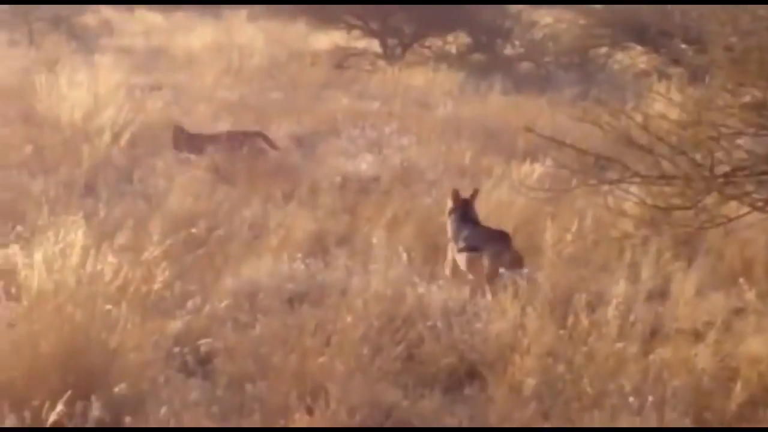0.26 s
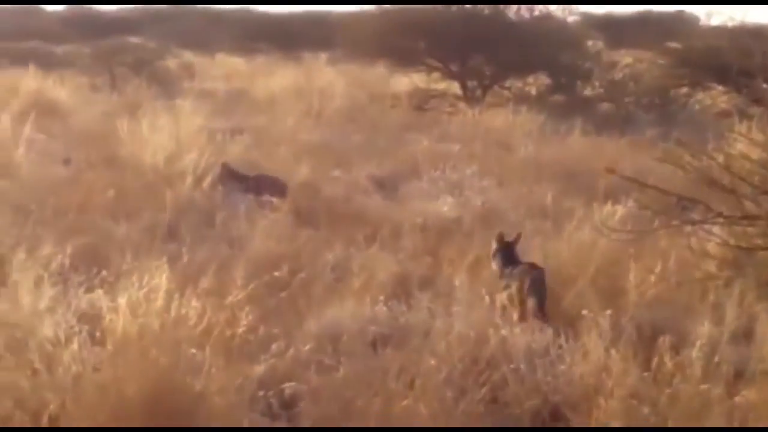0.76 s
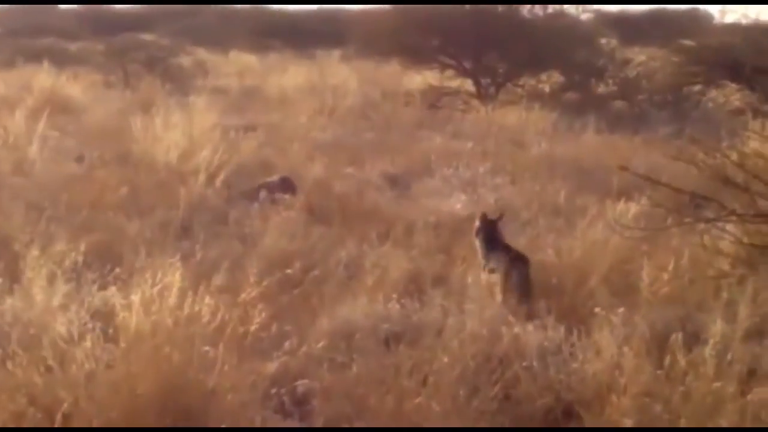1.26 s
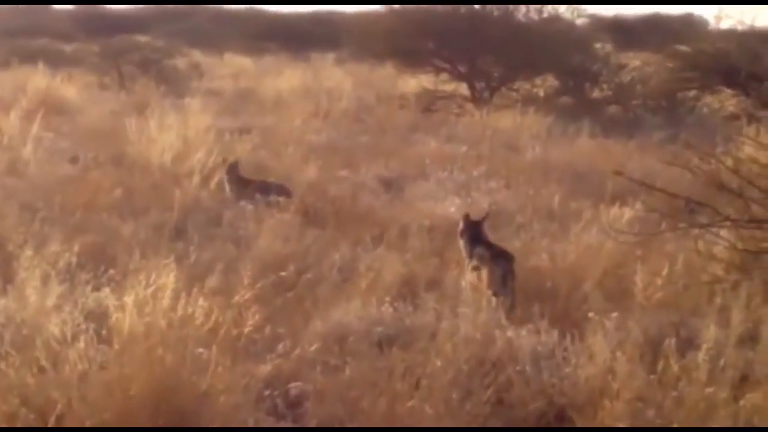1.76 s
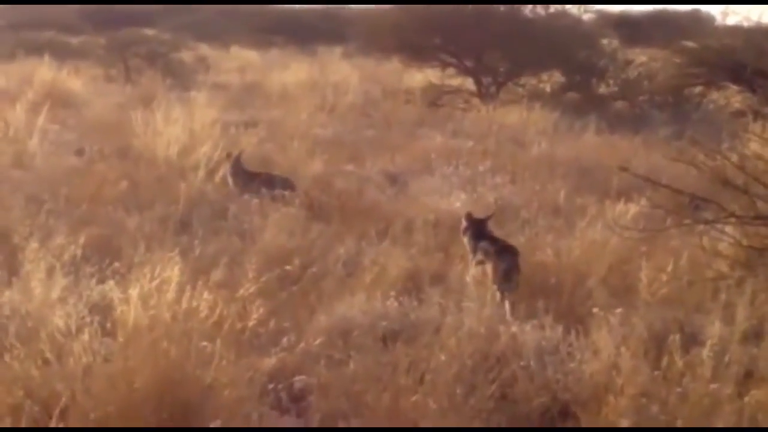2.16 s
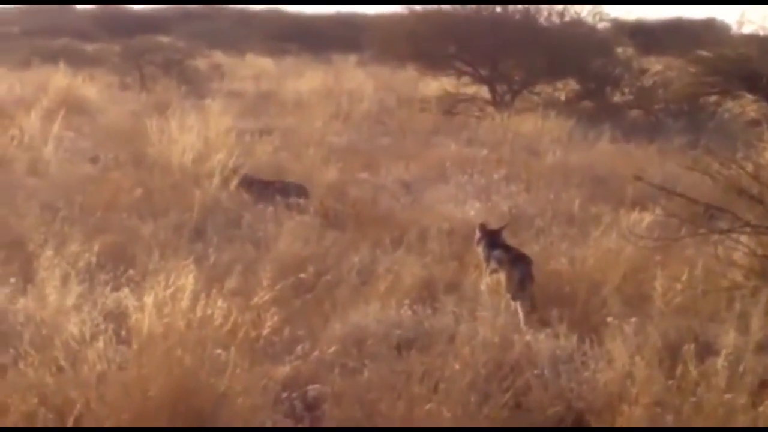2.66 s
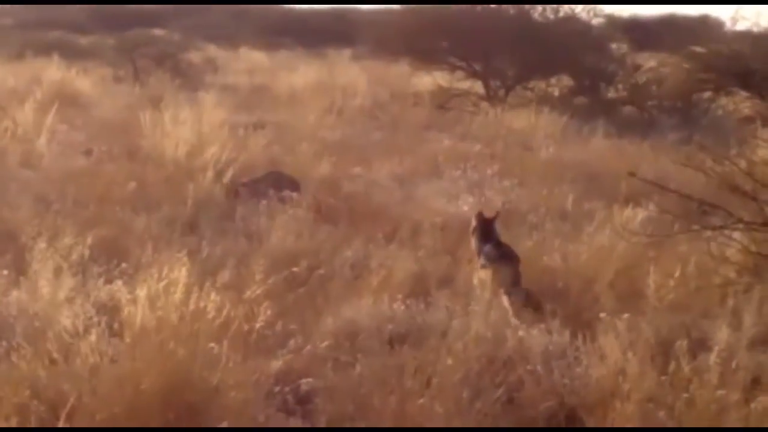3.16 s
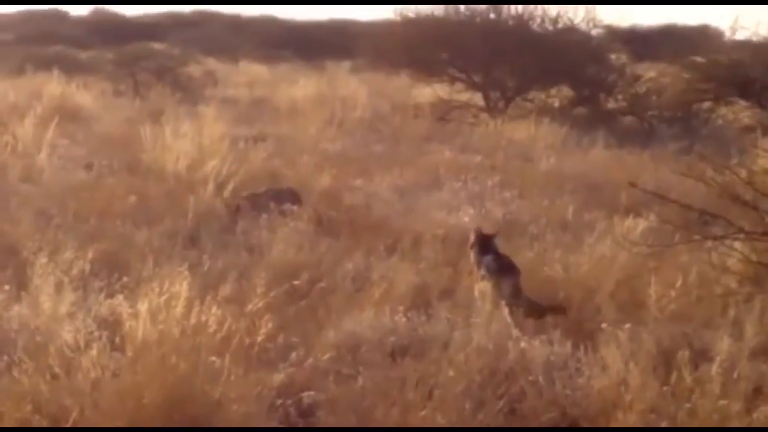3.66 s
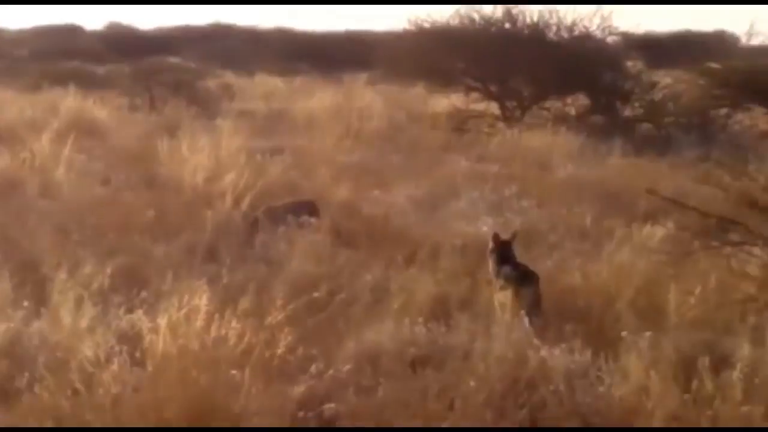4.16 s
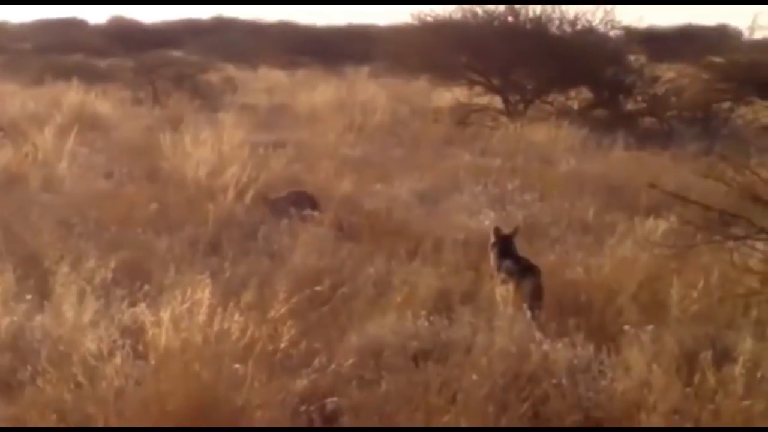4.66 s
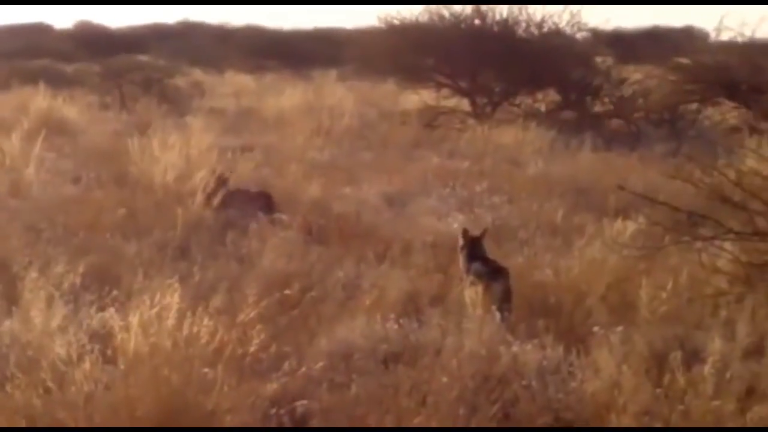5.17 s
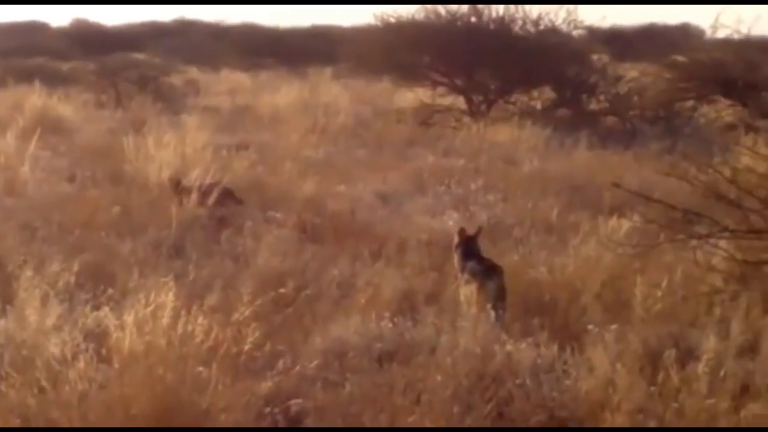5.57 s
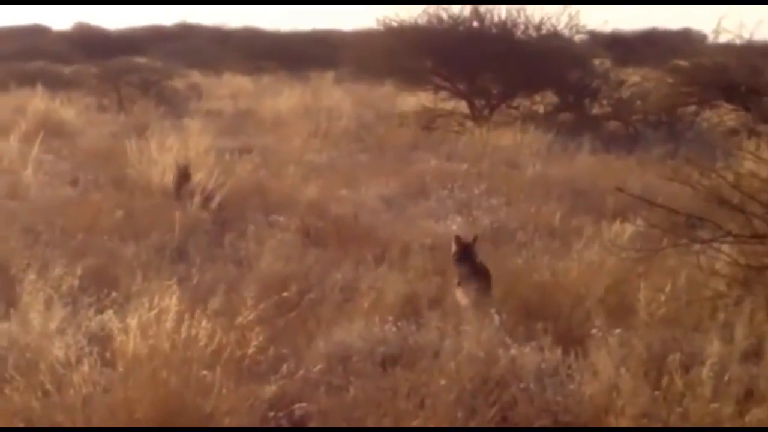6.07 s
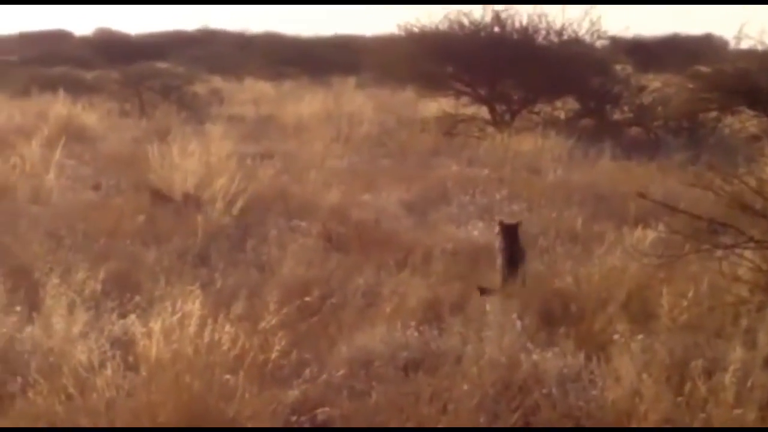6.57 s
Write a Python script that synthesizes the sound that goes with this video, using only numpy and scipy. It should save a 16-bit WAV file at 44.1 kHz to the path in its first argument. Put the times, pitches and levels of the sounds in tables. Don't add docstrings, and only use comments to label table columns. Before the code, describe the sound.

Breathy canine huffs and a short rising growl break into sharp high yelps, with bird chirps, faint grass hiss, shutter clatter and handling knocks.

```python
import sys
import numpy as np
from scipy import signal
from scipy.fft import rfft, irfft, next_fast_len
from scipy.io import wavfile
from scipy.ndimage import uniform_filter1d

SR = 44100
rng = np.random.default_rng(int(sys.argv[2]) if len(sys.argv) > 2 else 0)


def log_audio(samples):
    frames = np.atleast_2d(samples).T
    limited = np.clip(frames, -1, 1)
    pcm = np.round(limited * 32767).astype(np.int16)
    wavfile.write(sys.argv[1], SR, pcm)


def ratio(d):
    e = np.asarray(d, float) / 20
    return 10 ** e


N = 300762

# (frequency [Hz], level [dB])
CAMERA_PARTS = [(200, -19.5), (800, -17.5), (1800, -18), (2800, -4), (6000, -1.5), (7400, -17.5),
                (9500, -30), (12000, -36.5), (15000, -41.5)]


def evened(x):
    return x / np.sqrt(np.mean(x ** 2) + 1e-20)


def read(points, hz):
    f, value = np.transpose(points)
    return np.interp(np.log(hz + 1), np.log(f + 1), value)


def add(mix, s, sound):
    part = mix[:, round(s * SR):][:, :sound.shape[-1]]
    part += sound[..., :part.shape[1]]


def panned(x, db):
    return x * ratio(np.array([[db / 2], [-db / 2]]))


def coloured(x, points, scale=1):
    size = next_fast_len(x.shape[-1] + 2048)
    gain = ratio(scale * read(points, np.fft.rfftfreq(size, 1 / SR)))
    return irfft(rfft(x, size) * gain, size)[..., :x.shape[-1]]


def hiss(points, patchy_db):
    # (frequency [Hz], likeness [0-1])
    likeness = [(60, .36), (230, .45), (500, .2), (1800, 0), (6920, .1)]
    hz = np.fft.rfftfreq(512, 1 / SR)
    a, b, c, d, patches = rng.standard_normal((N // 128 + 5, 257, 5)).T
    patches = uniform_filter1d(patches, size=5, axis=0)
    patches = evened(uniform_filter1d(patches, size=14, axis=1))
    same = np.clip(read(likeness, hz), 0, 1)[:, None]
    left = a + 1j * b
    right = same * left + np.sqrt(1 - same ** 2) * (c + 1j * d)
    gain = ratio(read(points, hz)[:, None] + patchy_db * patches)
    noise = signal.istft(np.array([left, right]) * gain, nperseg=512, noverlap=384)[1]
    return evened(noise[:, :N])


def air():
    # (time [s], insects [dB], breeze [dB], far drone [dB]); at 2.8-2.92 s the drone's layer
    # # instead lends the end of the growl its band near 1.5 kHz
    strength = [(0.0, -62, -67, -72.5), (0.28, -66, -66, -78), (0.98, -68.5, -73.5, -101),
                (1.15, -66.5, -65, -69.5), (1.57, -64, -62.5, -86), (2.07, -89, -77.5, -81),
                (2.34, -79, -75, -88), (2.7, -73, -66, -81), (2.8, -72, -69, -67),
                (2.92, -72.5, -63.5, -70.5), (3.04, -62, -56, -79), (3.279, -90, -69, -82),
                (3.97, -76.5, -69.5, -79.5), (4.67, -86.5, -76.5, -81), (5.1, -74, -71.5, -83.5),
                (5.25, -69.5, -73.5, -71.5), (5.42, -67, -74, -66.5), (5.66, -70.5, -71.5, -70),
                (5.75, -70, -71.5, -88.5), (6.82, -68, -76.5, -87)]
    # (frequency [Hz], level [dB])
    insect_colour = [(1180, -42.5), (2000, -18.5), (2870, -10), (3550, -3.5), (4690, 4), (5770, -3),
                     (7370, -20.5), (9580, -59), (16200, -120)]
    breeze_colour = [(25, -44.5), (60, -8), (110, -3.5), (250, -6.5), (500, -11), (1000, -11.5),
                     (2000, -15.5), (3200, -19.5), (5000, -42.5)]
    drone_colour = [(1000, -38.5), (1330, -17.5), (1480, -0.5), (1640, -18), (1900, -34.5), (2600, -32.5),
                    (2800, -8), (3000, -42)]
    microphone_colour = [(20, -44), (42, -30), (75, -5.5), (130, 0), (700, -17.5), (1400, -17.5),
                         (2100, -11.5), (4800, -11), (7400, -21), (10000, -26.5), (15000, -37)]
    s, *levels_db = np.transpose(strength)
    insects, breeze, drone = (ratio(np.interp(np.arange(N) / SR, s, db)) for db in levels_db)
    far = drone * hiss(drone_colour, patchy_db=3.5)
    near = insects * ratio(1.5) * hiss(insect_colour, patchy_db=3)
    grass = breeze * hiss(breeze_colour, patchy_db=5.0)
    return near + grass + far + ratio(-77.5) * hiss(microphone_colour, patchy_db=2.0)


def noise_bursts():
    # (centre [s], length [s], level [dB], lowest frequency [Hz], highest frequency [Hz])
    bursts = [(2.989, .02, -58, 3590, 7500), (3.064, .12, -77, 7140, 14700),
              (3.612, .04, -64.5, 2570, 5500), (3.648, .045, -55.5, 4270, 7120),
              (3.661, .08, -78, 8570, 11930), (3.689, .06, -65.5, 4000, 7200),
              (6.098, .05, -61, 3380, 5500), (6.155, .016, -62, 4040, 5600),
              (6.337, .065, -60, 3510, 4730), (6.286, .07, -73, 151.6, 762)]
    mix = np.zeros((2, N))
    for s, length, db, low_hz, high_hz in bursts:
        noise = rng.standard_normal((3, SR // 6))
        band_colour = [(.8 * low_hz, -30), (low_hz, 0), (high_hz, 0), (1.1 * high_hz, -30)]
        band = evened(coloured(noise[0] + noise[1:], band_colour))
        size = round(length * SR)
        add(mix, s - length / 2, ratio(db) * band[:, :size] * np.hanning(size))
    return mix


def warbler():
    # (delay [s], length [s], start pitch [Hz], end pitch [Hz], level [dB])
    phrase = [
        (0, 0.0078, 4114, 4020, 1),
        (.024, .05, 4715, 4593, 1.5),
        (.066, .012, 4750, 5050, 0),
        (0.072, .007, 4080, 3950, 0),
    ]
    # (time [s], level [dB])
    song = [(2.214, -68), (2.438, -62), (2.66, -61), (2.879, -59), (5.768, -59.5), (5.994, -58),
            (6.215, -57), (6.431, -54), (6.657, -57)]
    chirps = []
    for s, db in song:
        for delay, length, from_hz, to_hz, part_db in phrase:
            from_hz = from_hz * rng.uniform(.98, 1.03)
            to_hz = to_hz * rng.uniform(.98, 1.02)
            chirps.append((s + delay, length, from_hz, to_hz, db + part_db + rng.uniform(-4, 2)))
    return chirps


def birds():
    # (time [s], length [s], start pitch [Hz], end pitch [Hz], level [dB])
    sweeps = [(0.186, 0.03, 3710, 6070, -56), (0.212, 0.017, 6080, 4340, -53.5),
              (0.894, 0.016, 5620, 3800, -54.5), (1.031, 0.016, 4800, 3970, -61),
              (1.069, 0.034, 6320, 4800, -61.5), (1.142, 0.013, 4760, 4100, -59.5),
              (1.172, 0.023, 5780, 3880, -56.5), (1.842, 0.018, 4780, 4600, -63.5),
              (2.029, 0.031, 6730, 3600, -59), (2.06, 0.0054, 3670, 5830, -49),
              (2.07, 0.029, 5950, 4190, -55)]
    # (time
    # [s], length [s], start pitch [Hz], end pitch [Hz], level [dB])
    scattered = [(0.411, 0.064, 1350, 1210, -66), (1.09, 0.018, 3880, 3750, -63),
                 (1.63, 0.024, 5050, 5000, -77), (1.665, 0.077, 4990, 6020, -70.5),
                 (1.708, 0.11, 4370, 2370, -63.5), (1.865, 0.036, 4700, 3750, -54),
                 (2.584, 0.049, 3070, 2630, -62), (2.661, 0.068, 2556, 2485, -67.5),
                 (3.708, 0.048, 6540, 6466, -61), (4.681, 0.03, 4580, 3838, -66),
                 (4.909, 0.11, 245.4, 238.4, -72), (4.92, 0.074, 493, 477, -76),
                 (5.13, 0.074, 3786, 2430, -73.5), (4.964, 0.03, 4340, 4060, -59),
                 (5.013, 0.031, 4520, 4130, -54), (5.578, 0.036, 6560, 5700, -59),
                 (5.726, 0.011, 4300, 4146, -54.5), (5.855, 0.01, 4720, 4320, -54.5),
                 (3.845, 0.03, 6630, 6490, -72.5), (6.59, 0.065, 3790, 4350, -57)]
    mix, t = np.zeros((2, N)), np.arange(5000) / SR
    for chirps, pan_db in ((sweeps, -7), (scattered, -2.5), (warbler(), -5)):
        for s, length, from_hz, to_hz, db in chirps:
            hz = np.linspace(from_hz, to_hz, round(length * SR))
            waver = evened(uniform_filter1d(rng.standard_normal(6000), size=90))[:len(hz)]
            hz = hz * (1 + .016 * waver)
            whistle = np.sin(2 * np.pi * np.cumsum(hz) / SR) * signal.windows.tukey(len(hz), .6)
            add(mix, s, panned(ratio(db - 0.5) * whistle, pan_db))
    twigs = rng.standard_normal((2, len(t))) * ratio(-60 * t / .13)
    twigs = twigs / np.linalg.norm(twigs[0])
    return mix + ratio(-4) * signal.fftconvolve(mix, twigs, axes=1)[:, :N]


def shutter():
    # (delay [s], level [dB], time to fade by 60 dB [s], left over right [dB])
    slaps = [(0, 1, 0.12, -1.5), (0.0144, 0, .15, 1), (.052, -2, .28, -0.5), (.078, 1.5, .14, 1.5)]
    # (time [s], level [dB], slaps that
    firings = [
        (0.4863, -30, 4),
        (2.996, -32.5, 4),
        (3.6465, -40.5, 1),
    ]
    mix, t = np.zeros((2, N)), np.arange(4000) / SR
    for s, db, parts in firings:
        for delay, part_db, t60, pan_db in slaps[:round(parts)]:
            noise = rng.standard_normal((3, len(t)))
            rattle = evened(coloured(noise[0] + 2.6 * noise[1:], CAMERA_PARTS))
            fade = ratio(-60 * t / 0.045) + 0.9 * ratio(-60 * t / t60)
            slap = panned(rattle * fade * np.minimum(t / 0.0005, 1), pan_db)
            add(mix, s + delay, ratio(db + part_db - 12.0) * slap)
    return mix


def finger_shifts():
    # (time [s], level [dB], pitch [Hz])
    touches = [(0.007, -68, 153), (0.096, -72, 324), (0.164, -74, 270), (0.229, -66, 326),
               (1.776, -72, 236)]
    mix, t = np.zeros((2, N)), np.arange(1500) / SR
    for s, db, hz in touches:
        add(mix, s, ratio(db + 17 - 60 * t / 0.025) * np.sin(2 * np.pi * hz * t))
    return mix


def knocks():
    # (time [s], thump level [dB], left over right [dB], tick level [dB])
    hits = [
        (4.267, -27.5, 12.5, -42.5),
        (5.778, -42.5, 27.5, -49),
        (5.795, -20.5, 43, -43),
    ]
    mix, t = np.zeros((2, N)), np.arange(5000) / SR
    for s, db, pan_db, tick_db in hits:
        ring = np.sin(2 * np.pi * 95 * (t - .0015)) * ratio(-60 * t / 0.066) * np.minimum(t / .002, 1)
        push = -1.9 * np.exp(-((t - .0012) / 0.00021) ** 2)
        tick = evened(coloured(rng.standard_normal((2, len(t))), CAMERA_PARTS))
        tick = tick * ratio(tick_db - 60 * t / 0.037)
        add(mix, s, ratio(db - 4) * (ring + push) * ratio(np.array([[0], [-pan_db]])) + tick)
    return mix


def grassland(x):
    t = np.arange(SR // 2) / SR
    echoes = rng.choice([-1., 1.], (2, len(t))) * (rng.random((2, len(t))) < .04)
    near = (echoes[0] + .4 * echoes) * ratio(-60 * t / .012) * (t > .0003)
    near = coloured(near, [(300, -14), (1200, 0)])
    far = echoes * ratio(-60 * t / 0.093) * (t > .03)
    trees = echoes * np.exp(-((t - .215) / 0.0039) ** 2)
    trees = coloured(trees, [(900, -20), (1600, 3.5), (5000, -0.5)])
    tail = 0
    for db, part in ((-5.5, near), (-21, far), (-45.5, trees)):
        tail = tail + ratio(db) * part / np.linalg.norm(part, axis=1, keepdims=True)
    return signal.fftconvolve(x, tail, axes=1)[:, :N]


def shaded(x):
    # (centre [s], length [s], share lost [0-1])
    shades = [(3.03, .04, 0.67), (3.19, .04, 0.86), (3.225, .04, 0.46), (3.77, 0.054, 0.4),
              (3.81, 0.053, 0.4), (6.66, 0.016, 0), (6.74, 0.044, 0.7)]
    # (frequency [Hz], level [dB])
    shaded_band = [(800, -29.5), (1150, -11.5), (1450, -7.5), (1620, 3), (1800, -1), (2200, -12)]
    shimmer = .3
    t = np.arange(N) / SR
    lost = sum(share * np.exp(-(2 * (t - s) / length) ** 2) for s, length, share in shades)
    lost = np.clip(lost, 0, 1)
    drift = uniform_filter1d(uniform_filter1d(rng.standard_normal(N), size=900), size=900)
    upper = coloured(x[0], [(300, -20), (600, -8), (1300, 0)])
    turned = signal.hilbert(upper, next_fast_len(N))[:N].imag
    left = x[0] - lost * coloured(x[0], shaded_band) + shimmer * evened(drift) * turned
    return np.array([left, x[1]])


def voice(rows, throat, faults, jitter, lag, count):
    s, *columns = np.transpose(rows)
    t = np.arange(s[0], s[-1], 1 / SR)
    hz, level_db, shift = (np.interp(t, s, c) for c in columns)
    rough, sub, flutter, catch_db, low_db, top_db, air_db, tongue_db = faults(t, hz)
    rough = np.clip(rough, 0, 1)
    wobble = evened(uniform_filter1d(rng.standard_normal(SR), size=150))[:len(t)]
    beat = np.exp(2j * np.pi * 73 * (t - 6.686))
    turns = np.cumsum(hz * (1 + jitter * rough * wobble + 0.062 * flutter * beat.imag)) / SR
    k = np.arange(1, 2 * count + 1)[:, None] / 2
    line_hz = k * hz
    lift_db = low_db * np.clip(np.minimum(8.2 - line_hz / 100, line_hz / 100 - 3.3), 0, 1)
    lift_db = lift_db + top_db * np.clip(np.minimum(line_hz / 300 - 6.3, 7.6 - line_hz / 400), 0, 1)
    lift_db = lift_db + air_db * np.clip(line_hz / 200 - 11.5, 0, 1)
    lift_db = lift_db + tongue_db * np.clip(np.minimum(line_hz / 100 - 14.5, 23 - line_hz / 100), 0, 1)
    uneven = np.where(k % 1, sub * np.minimum(k / 2.4, 1) ** 2, 1)
    height = ratio(read(throat, line_hz / shift) + lift_db) * uneven
    folds = (height * np.cos(2 * np.pi * k * turns - lag * k ** 2)).sum(0)
    folds = folds / np.sqrt((height ** 2).sum(0) / 2)
    puffs = (.6 + np.exp(-(turns % 1) / 0.11)) * rng.standard_normal(SR)[:len(t)]
    sound = np.sqrt(1 - rough ** 2) * folds + rough * evened(coloured(puffs, throat))
    sound = sound * (1 + flutter * beat.real)
    edge = np.clip(np.minimum(t - s[0], s[-1] - t) * 200, 0, 1)
    return s[0], ratio(level_db + catch_db) * edge * sound


def huffs():
    # (time [s], peak level [dB], pitch [Hz], length [s], mouth opening [0-1])
    breaths = [(0.325, -40.5, 202.9, 0.11, 0), (0.86, -27.5, 270.9, 0.078, 0.6),
               (1.47, -40, 199.2, 0.091, 0.1), (2.278, -46, 211.5, 0.12, 0.2),
               (4.208, -42.5, 224.7, 0.093, 0.5), (4.618, -39.5, 226.5, 0.096, 0.25),
               (5.075, -45.5, 211, 0.1, 0.1), (5.599, -39.5, 210.3, .1, 0.22),
               (6.078, -31.5, 273.4, 0.059, 0.6)]
    # (frequency [Hz], level [dB])
    open_throat = [(59, -57), (100, -7), (220, -15), (391, -20.5), (557, 5.5), (923, -12), (1090, 5.5),
                   (1330, -4.5), (1640, 9), (2600, -43), (3380, -76), (5720, -120)]
    soft_throat = [(60, -8), (150, -1.5), (270, 3), (500, 2.5), (780, -22), (1000, -3), (1200, -30),
                   (1450, -4.5), (1750, -65), (2500, -54)]
    rough_shut, rough_open, jaw_rise = .45, .24, .7
    mix = np.zeros((2, N))
    for s, db, hz, length, mouth in breaths:
        throat = [(f, mouth * read(open_throat, f) + (1 - mouth) * read(soft_throat, f))
                  for f in np.geomspace(60, 4000, num=60)]
        # (place in lengths, pitch factor, level [dB])
        shape = [(-.17 - .25 * mouth, 1, -39), (-.07, .97, -15), (.2, 1.03, -4.5), (.45, .97, -19),
                 (.85, 0.6, -42)]
        rows = [(s + p * length, f * hz, db + d, np.clip(1 + jaw_rise * p, .5, 1)) for p, f, d in shape]
        rough = rough_shut + (rough_open - rough_shut) * mouth
        sub = .4 - .35 * mouth

        def faults(t, hz):
            return rough, sub, 0, 0, 0, 0, 0, 0
        add(mix, *voice(rows, throat, faults, jitter=0.14, lag=0.1, count=10))
    return mix


def growl():
    # (time [s], pitch [Hz], level [dB])
    course = [(2.239, 88.2, -67), (2.3, 91.7, -51.5), (2.391, 74.97, -52.5), (2.6, 81.37, -52.5),
              (2.698, 86.26, -53.5), (2.83, 99.6, -49), (2.919, 102.4, -50), (2.97, 117.4, -49.5)]
    # (frequency [Hz], level [dB])
    shut_throat = [(40, -29), (90, -12.5), (160, 1), (320, 1.5), (480, -12), (620, -12), (760, -34.5),
                   (920, -9), (1080, -41.5), (1450, -26), (1800, -36), (2500, -57)]

    def faults(t, hz):
        above = np.maximum(hz - 85, 0)
        return .3 + .018 * above, .1, 0, 0, 0.58 * above, 0, 0, 0
    mix = np.zeros((2, N))
    add(mix, *voice([(*row, 1) for row in course], shut_throat, faults, jitter=.13, lag=-.42, count=20))
    return mix


def spell(t, s, length):
    return np.clip(3 - 6 * abs(t - s) / length, 0, 1)


def spells(t, table):
    return sum(spell(t, s, length) * np.array(depths)[:, None] for s, length, *depths in table)


def yelp(rows, attack, low_db, top_db, air_db):
    # (frequency [Hz], level [dB])
    wide_throat = [(120, -29), (380, -15), (575, -6), (820, -14), (1150, -2), (1350, 9.5), (1750, 0),
                   (2000, -12.5), (2300, -35.5), (2800, -31), (3400, -54), (4200, -66), (9000, -85)]
    # (delay [s], pitch [factor], level [dB])
    release = [(.009, .93, -3.5), (.021, .66, -9), (.04, .56, -26), (.055, .55, -52)]
    # (pitch [Hz], roughness [0-1], strong-weak pulses [0-1])
    slack = [(300, .38, .08), (400, .11, .03), (540, .028, .015)]
    # (pitch [Hz], lift [dB])
    nasal = [(290, 22.5), (400, 1), (450, -5.5), (560, -6)]
    # (centre [s], length [s], roughness [0-1], strong-weak pulses [0-1], flutter depth [0-1])
    breaks = [(2.952, .056, .55, .2, 0), (3.295, .04, .3, .1, 0), (3.61, .04, .3, .1, 0),
              (3.669, .022, .55, .25, 0), (3.684, .02, .14, .15, 0), (3.89, .04, .3, .1, 0),
              (6.53, .04, .15, .1, 0), (6.56, .03, .08, .1, 0), (6.585, .02, .24, .12, 0),
              (6.606, .03, .12, .14, .1), (6.655, .044, .13, .4, 0), (6.689, .056, .09, 0, .5),
              (6.735, .09, .05, .06, 0)]
    # (centre [s], length [s], level [dB], low resonance [dB], top partials [dB])
    catches = [(3.23, 0.15, 0, -1.5, 12.5), (4, .014, -2.5, -15, 0), (3.74, 0.033, 1, 2.7, -2.5),
               (6.567, .03, 1.5, -3.3, 1), (3.824, 0.12, -1.9, 0, 1.5), (6.586, 0.018, -6.5, 1.5, -2),
               (6.608, 0.025, -3, -35.5, 11), (6.6, 0.1, 2.54, 1.5, 5), (6.655, .03, -0.5, -11, 2),
               (6.697, .034, -2.5, 5.5, 4.5), (6.756, 0.28, 0.5, 7.5, -7)]
    # (centre [s], length [s], lift [dB])
    tongue = [(3.2, .03, 0.5), (3.258, .04, -0.5), (6.612, .024, -23), (6.664, .05, 2), (6.68, 0.049, 6.5),
              (6.8, .06, 4.5)]
    (s, _, db, shift), (end, end_hz, end_db, end_shift) = rows[0], rows[-1]
    chest = [(s - attack, 277.25, db - 43.5, shift)]
    fall = [(end + d, f * end_hz, end_db + drop_db, end_shift * 0.97) for d, f, drop_db in release]

    def faults(t, hz):
        at, slack_rough, slack_sub = np.transpose(slack)
        rough, sub, flutter = spells(t, breaks)
        catch_db, shut_db, wide_db = spells(t, catches)
        tongue_db, = spells(t, tongue)
        rough = rough + np.interp(hz, at, slack_rough)
        sub = sub + np.interp(hz, at, slack_sub)
        resonance_db = low_db + shut_db + read(nasal, hz)
        return rough, sub, flutter, catch_db, resonance_db, top_db + wide_db, air_db, tongue_db
    return voice(chest + rows + fall, wide_throat, faults, jitter=0.13, lag=.1, count=12)


def jackal():
    # (time [s], pitch [Hz], level [dB], throat shift [factor])
    yelps = [
        [(2.962, 313.2, -30, 0.63), (2.98, 406.7, -27, 0.79), (3.0, 447, -18, 0.95), (3.018, 551.4, -22, 1.023),
         (3.04, 577, -23.5, 1.015), (3.07, 604.5, -22.5, 1.05), (3.107, 560.2, -22.5, .95),
         (3.158, 550.2, -23, 0.95), (3.27, 491.7, -23, 0.98)],
        [(3.607, 288.2, -31.5, 0.79), (3.624, 298.9, -30, 0.82), (3.634, 389.3, -24.5, 0.89),
         (3.652, 424.4, -17.5, 0.91), (3.672, 571, -23.5, 1.025), (3.73, 600, -25, 1.082),
         (3.766, 587, -21, 1.0), (3.771, 563.5, -20, 0.98), (3.865, 548.9, -22.5, 0.95)],
        [(6.526, 280.6, -32.5, 0.76), (6.543, 300.8, -28.5, 0.98), (6.555, 378.4, -28, 0.88),
         (6.575, 447.4, -24, 0.92), (6.596, 624, -22.5, 1), (6.634, 707, -13, 1), (6.672, 681.6, -15, 1.0),
         (6.708, 598.3, -22.5, 1), (6.86, 528.3, -29, 0.87)],
    ]
    # (attack [s], lift of the low resonance [dB], lift of about 2-2.9 kHz [dB], further lift above
    # 2.4 kHz [dB], head turn left over right [dB])
    manner = [(0.065, 3, -2, -13, -1), (0.021, -1, 4, -1, -1), (.024, 1.5, 4, -5, -1.4)]
    # (frequency [Hz], left over right [dB])
    ears = [(250, .4), (550, -.5), (840, -1.6), (1120, -2.6), (1400, -2.8), (1750, -2), (2400, -2.4),
            (4000, -3)]
    mix = growl() + huffs()
    for rows, (*settings, pan_db) in zip(yelps, manner):
        s, sound = yelp(rows, *settings)
        add(mix, s, panned(sound, pan_db))
    return np.array([coloured(mix[0], ears, .5), coloured(mix[1], ears, -.5)])


def scene():
    animal = jackal()
    background = air() + noise_bursts() + birds()
    camera_noises = shutter() + finger_shifts() + knocks()
    return background + camera_noises + shaded(animal + grassland(animal))


def band_limit(x):
    return signal.sosfilt(signal.butter(12, 15100, fs=SR, output="sos"), x)


def record(dry):
    # (frequency [Hz], level [dB])
    low_cut = [(22, -9), (42, -3), (65, 0)]
    rumble = coloured(abs(dry), [(15, -38.0), (60, -16), (120, 0.0), (250, -2.5), (400, -39.0)])
    return band_limit(coloured(dry + ratio(-19.0) * rumble, low_cut))


dry = scene()
out = record(dry)
log_audio(out)
```